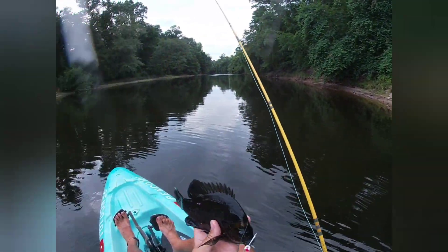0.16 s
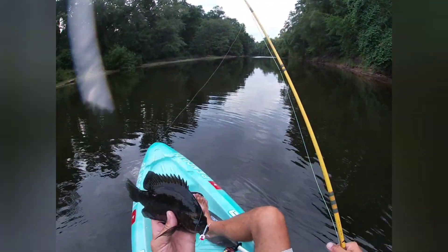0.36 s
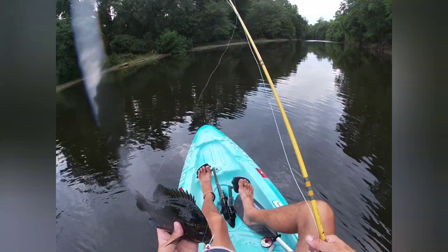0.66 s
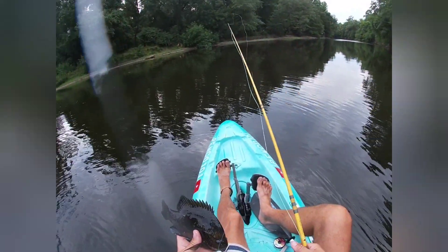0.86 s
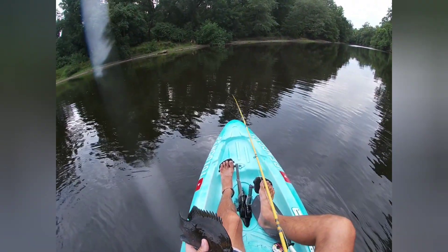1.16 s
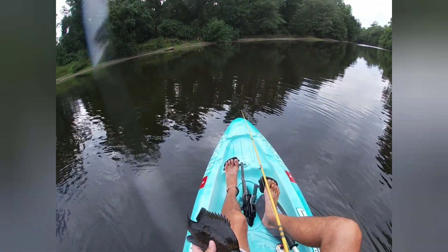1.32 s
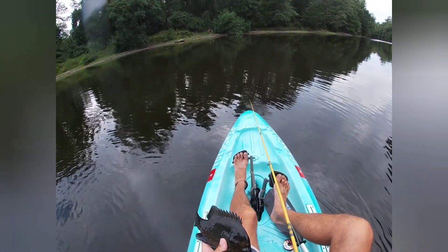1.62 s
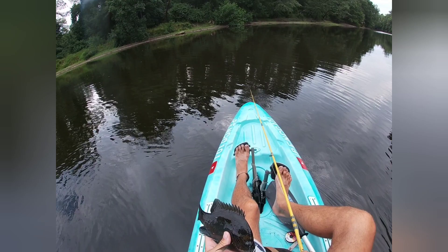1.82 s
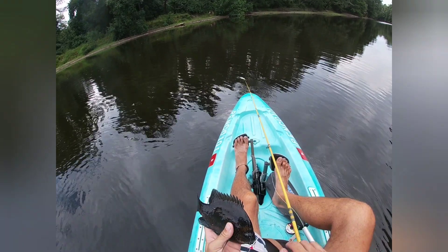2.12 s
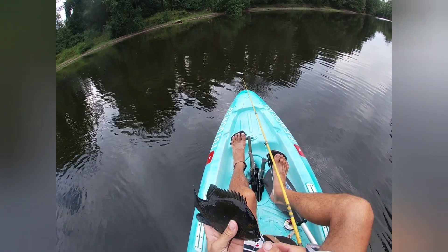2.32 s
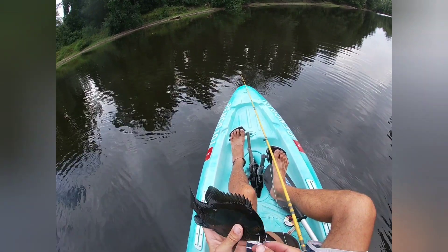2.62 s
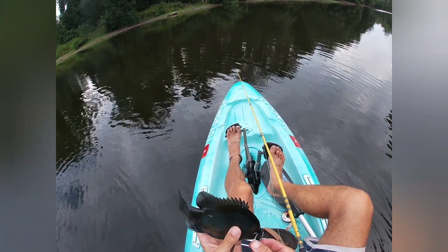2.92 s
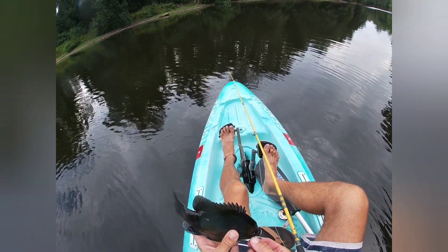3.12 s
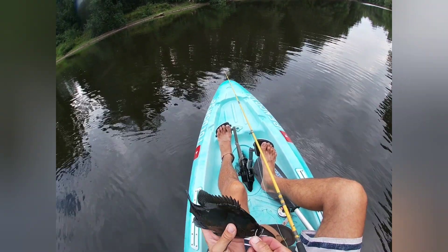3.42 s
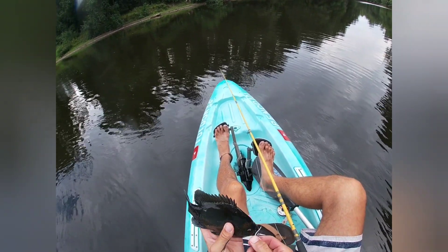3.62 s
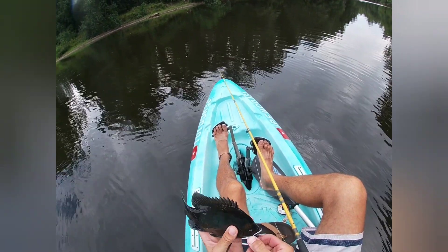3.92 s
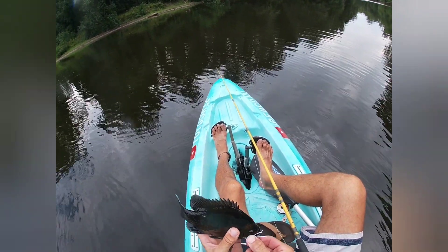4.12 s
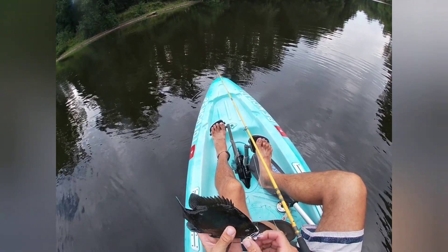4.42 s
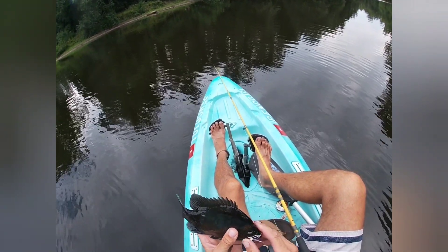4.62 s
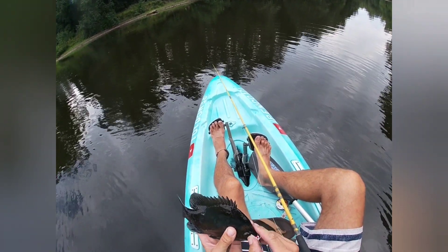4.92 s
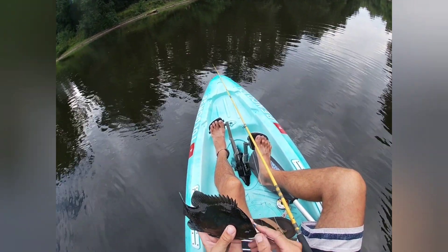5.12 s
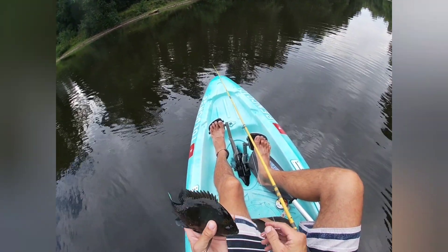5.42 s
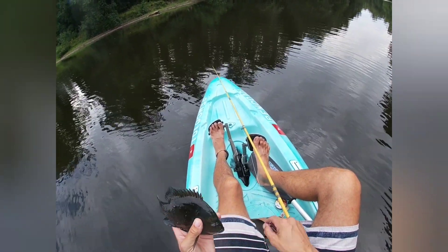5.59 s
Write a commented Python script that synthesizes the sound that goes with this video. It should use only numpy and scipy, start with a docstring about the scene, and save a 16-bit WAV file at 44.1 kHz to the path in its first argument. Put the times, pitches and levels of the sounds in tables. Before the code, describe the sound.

Outdoors on a calm river, cicadas and crickets hiss and buzz steadily. After a few dull gear taps and a bump, a fishing rod drops on a hollow plastic kayak with bright cracks and bounces at about 1.4 to 2 seconds. Afterwards the insects dominate, with short chirps, a second cicada joining, and a tiny metal clink near 5 seconds. Close microphone on the angler, mono, with light low air rumble.

```python
"""Still river with insects and a dropped rod

Cicadas (click trains ringing resonances, throbbing noise) and crickets (pulsed narrow noise) drone over a far
chorus of flickering noise bands. A fishing rod is laid down and bounces on a plastic kayak hull: noise cracks,
ringing rod and hull modes. The hull is tapped lightly, and gear bumps, rustles and clinks, as short modes and
puffs of noise. Low noise bands make air on the microphone, low thuds, and a growing far hum and drone."""
import sys
import numpy as np
from scipy import signal
from scipy.fft import rfft, irfft, next_fast_len
from scipy.io import wavfile
from scipy.ndimage import uniform_filter1d

SR = 44100
rng = np.random.default_rng(int(sys.argv[2]) if len(sys.argv) > 2 else 0)


def persist_wave(psi):
    """Save psi, clipped to +-1, as 16-bit WAV."""
    counts = np.round(np.clip(psi, -1, 1) * 32767).astype(np.int16)
    wavfile.write(sys.argv[1], SR, np.atleast_2d(counts).T)


N = 253822
TIME = np.arange(N) / SR


def undb(db):
    """Decibels to amplitude."""
    return 10 ** (np.asarray(db) / 20)


def unit(x):
    """Scale to rms 1."""
    return x / np.sqrt(np.mean(x ** 2))


def noise():
    """White noise over the whole scene."""
    return rng.standard_normal(N)


def curves(table):
    """Interpolate each column after the first over time."""
    time_s, *columns = np.transpose(table)
    return [np.interp(TIME, time_s, column) for column in columns]


def band(x, hz, width_hz):
    """Resonance with gain 1 at its centre."""
    return signal.lfilter(*signal.iirpeak(hz, hz / width_hz, SR), x)


def steep(x, hz, width_hz):
    """Resonance applied twice, at rms 1."""
    return unit(band(band(x, hz, width_hz), hz, width_hz))


def walk(rate_hz):
    """Random levels held 1 / rate_hz, smoothed twice; rms 1."""
    hold = int(SR / rate_hz)
    steps = np.repeat(rng.standard_normal(N // hold + 1), hold)
    smooth = uniform_filter1d(uniform_filter1d(steps, hold), hold)
    return unit(smooth[:N])


def strokes(rate_hz, sharp, drift=0.0115):
    """One swell per wing stroke or tymbal click at a drifting tempo; also returns phase in cycles."""
    phase = np.cumsum(rate_hz * (1 + drift * walk(5.5))) / SR + rng.random()
    return np.exp(sharp * (np.cos(2 * np.pi * phase) - 1)), phase


def coloured(points, size):
    """Frequencies and spectrum of noise shaped by (hz, level_db) points."""
    hz = np.fft.rfftfreq(size, 1 / SR) + 1  # +1 avoids log(0)
    point_hz, point_db = np.transpose(points)
    shape_db = np.interp(np.log(hz), np.log(point_hz), point_db, -90, -90)
    return hz, rfft(rng.standard_normal(size)) * undb(shape_db)


def burst(points, rise_s, t60_s):
    """Coloured noise that rises quickly and decays exponentially; peak 1."""
    t = np.arange(SR // 3) / SR
    hiss = irfft(coloured(points, len(t))[1], len(t))
    out = hiss * (1 - np.exp(-t / rise_s)) * 1000. ** (-t / t60_s)
    return out / np.abs(out).max()


def ring(push, modes, loose_db=1.7):
    """Decaying modes with random sign, level and slight detuning, driven by a push; peak 1."""
    t = np.arange(SR // 3) / SR
    chance = rng.standard_normal((len(modes), 3))
    body = 0
    for (hz, db, t60_s), (detune, level, sign) in zip(modes, chance):
        amp = np.sign(sign) * undb(db + loose_db * level)
        tone = np.sin(2 * np.pi * hz * (1 + 0.0035 * detune) * t)
        body = body + amp * tone * 1000. ** (-t / t60_s)
    out = signal.fftconvolve(body, push)[:len(t)]
    return out / np.abs(out).max()


def tick(level_db, hz, t60_s, pure):
    """One softly struck mode inside a short puff of noise round its pitch; pure is the ring's share."""
    puff = burst([(0.21 * hz, -22), (hz, 0), (3.56 * hz, -20)], 0.4 / hz, t60_s)
    blow = np.sin(2 * np.pi * hz * np.arange(int(2 * SR / hz)) / SR)  # contact lasts two cycles
    share = np.clip(pure, 0, 1)
    return undb(level_db) * (share * ring(blow, [(hz, 0, t60_s)]) + (1 - share) * puff)


def add(out, start_s, x):
    """Mix x into out from start_s."""
    i = int(start_s * SR)
    out[i:i + len(x)] += x[:N - i]


def struck_body(events, modes, pure):
    """Each (start_s, level_db) event strikes every mode of a body."""
    out = np.zeros(N)
    for start_s, level_db in events:
        add(out, start_s, sum(tick(level_db + db, hz, t60_s, pure) for hz, db, t60_s in modes))
    return out


def buzzing_cicada(rate_hz, body):
    """Uneven tymbal clicks, strong and weak in turn, ring the body; echoes from the trees blur them."""
    clicks, phase = strokes(rate_hz * (1 + .003 * walk(60)), 600, drift=.0008)
    clicks = clicks * (1 + 0.21 * np.cos(np.pi * phase)) * undb(2.5 * walk(30))
    t = np.arange(SR // 4) / SR
    trees = rng.standard_normal(len(t)) * 1000. ** (-t / 0.15)
    trees[0] += 40  # direct sound
    drive = signal.fftconvolve(clicks, trees)[:N]
    return unit(sum(undb(db) * steep(drive, hz, width_hz) for hz, width_hz, db in body))


def cricket(hz, width_hz, rate_hz, sharp=0.81):
    """Narrow wing tone, blurred by distance, one swell per stroke."""
    return unit(strokes(rate_hz, sharp)[0] * steep(noise(), hz, width_hz))


# far insects and river air, smeared into a hiss: hz, relative_db_per_hz
CHORUS_SPECTRUM = [(150, -54), (250, -13.5), (450, -26), (740, -16.5), (1050, -24.5), (1600, -24.5),
                   (3200, -4), (4850, -4), (6750, -9), (7900, -0.5), (9380, -10.5), (9750, -24.5),
                   (11500, -33), (15400, -37)]


def chorus():
    """Countless far insects: noise in third octaves that flicker apart."""
    size = next_fast_len(N)
    (hz, spectrum), out = coloured(CHORUS_SPECTRUM, size), 0
    for step in range(21):
        share = np.clip(1 - np.abs(3 * np.log2(hz / 150.) - step), 0, 1)  # overlapping triangles
        out = out + irfft(spectrum * share, size)[:N] * undb(0.75 * walk(9))
    return unit(out) * undb(-49.5)


# tymbal tempo, before small random drift: time_s, clicks_per_s
FIRST_RATE = [(0, 280), (2.1, 286.2), (3.2, 291.8), (4, 297.5), (4.6, 299), (5.76, 300)]
# body resonances: hz, width_hz, relative_db
FIRST_BODY = [(4660, 300, -1), (9190, 660, -5.5)]
# song coming and going on the air: time_s, level_db
FIRST_LEVEL = [(0, -75), (.4, -62), (1.2, -58.5), (1.7, -66), (2.2, -58), (3.05, -57), (3.4, -61),
               (4.4, -61.5), (5.76, -60.5)]


def first_cicada():
    """Tymbal buzz that speeds up as the insect warms to its song."""
    return undb(curves(FIRST_LEVEL)[0]) * buzzing_cicada(curves(FIRST_RATE)[0], FIRST_BODY)


# rasp resonances: hz, width_hz, relative_db
RASP_BODY = [(4860, 1500, -10.5), (5590, 1500, 5), (3100, 2700, -7.5)]
RASP_DB, RASP_SWELL_DB, RASP_PEAK_S, RASP_SWELL_S = -58, 8.5, 0.74, 0.56


def swelling_cicada():
    """Broad noise rasp throbbing about 14 times a second; swells once above its resting level."""
    throb = 1 + 0.93 * strokes(14.0, 8.0)[0]
    rasp = unit(throb * sum(undb(db) * steep(noise(), hz, width_hz) for hz, width_hz, db in RASP_BODY))
    swell = np.exp(-.5 * ((TIME - RASP_PEAK_S) / RASP_SWELL_S) ** 2)
    return undb(RASP_DB + RASP_SWELL_DB * swell) * rasp


# steady trills: hz, width_hz, wing_strokes_per_s, relative_db
TRILL_VOICES = [(7980, 140, 76, -5), (8080, 200, 92, -6), (7710, 200, 210, -5)]
TRILL_DB, TRILL_RISE_DB_PER_S = -58, 0.93


def trilling_crickets():
    """Stroke-pulsed narrow tones that grow steadily."""
    trills = unit(sum(undb(db) * cricket(hz, width_hz, rate_hz)
                      for hz, width_hz, rate_hz, db in TRILL_VOICES))
    return undb(TRILL_DB + TRILL_RISE_DB_PER_S * TIME) * trills


# low wing tone: hz, width_hz, wing_strokes_per_s
LOW_VOICE = (4790, 150, 140)
LOW_DB, LOW_REST_DB, LOW_REST_AT_S, LOW_REST_S = -60.5, -6, 2.3, 0.54


def low_cricket():
    """Wavering low wing tone that slackens for a while."""
    rest = np.exp(-.5 * ((TIME - LOW_REST_AT_S) / LOW_REST_S) ** 2)
    level_db = LOW_DB + LOW_REST_DB * rest + 1.8 * walk(5.05)
    return undb(level_db) * cricket(*LOW_VOICE, sharp=0.45)


# low rumble and flutter levels: air on the microphone, with low thuds near the bump and knocks;
# a random waver is added: time_s, rumble_db, flutter_db
LOW_LEVELS = [(0.0, -72, -84), (0.05, -57.5, -63.5), (0.67, -49.5, -64.5), (0.75, -64, -71),
              (0.87, -47, -50), (1.3, -63.5, -77), (1.43, -77, -53), (1.51, -52.5, -59), (1.87, -68, -68),
              (2.26, -65, -84), (2.55, -83, -80), (3.83, -65.5, -76), (4.23, -74, -85), (4.73, -57.5, -57),
              (4.92, -68, -68), (5.5, -70, -72), (5.61, -56, -84), (5.76, -80, -74)]


def low_air_and_thuds():
    """Air on the microphone, with low thuds near the bump and knocks: two wavering low noise bands."""
    rumble_db, flutter_db = curves(LOW_LEVELS)
    rumble = steep(noise(), 27.0, 37.4) * undb(2.0 * walk(11))
    flutter = steep(noise(), 100.5, 65) * undb(2.3 * walk(8.2))
    return undb(rumble_db) * rumble + undb(flutter_db) * flutter


HUM_HZ, HUM_WIDTH_HZ, HUM_DB, HUM_RISE_DB_PER_S = 162.7, 65, -65.5, .7


def far_hum():
    """Wavering low noise band that slowly grows."""
    hum = steep(noise(), HUM_HZ, HUM_WIDTH_HZ) * undb(2.27 * walk(4.9))
    return undb(HUM_DB + HUM_RISE_DB_PER_S * TIME) * hum


DRONE_HZ, DRONE_WIDTH_HZ, DRONE_DB, DRONE_RISE_DB_PER_S = 221.7, 20.4, -98.5, 6


def high_drone():
    """Noise band higher and narrower than the hum, rising towards the end."""
    return steep(noise(), DRONE_HZ, DRONE_WIDTH_HZ) * undb(DRONE_DB + DRONE_RISE_DB_PER_S * TIME)


# dull taps on the hull: start_s, level_db, pitch_hz
HULL_TAPS = [(.085, -52, 810), (.61, -52, 695), (.648, -26, 2770), (.808, -35.5, 1325), (.845, -47.5, 810),
             (.93, -40.5, 796), (1.292, -44.5, 1270), (1.519, -50, 790), (1.667, -51, 2500),
             (1.718, -51, 710), (2.385, -53, 594), (2.729, -43, 1700), (3.925, -54, 680)]
TAP_CYCLES, TAP_PURE = 22, 0.22  # cycles until 60 dB down; ring share 0-1


def hull_taps():
    """Damped taps that die after a set number of cycles."""
    out = np.zeros(N)
    for start_s, level_db, pitch_hz in HULL_TAPS:
        add(out, start_s, tick(level_db, pitch_hz, TAP_CYCLES / pitch_hz, TAP_PURE))
    return out


# chirps of a nearer cricket: start_s, level_db
CHIRP_EVENTS = [(.33, -61), (1.03, -63), (1.48, -54.5), (1.72, -65), (2.108, -59), (2.33, -59), (2.7, -58),
                (2.94, -58), (3.2, -60), (3.45, -58), (4.26, -59), (4.49, -58), (4.7, -60), (4.9, -59),
                (5.45, -64)]
CHIRP_HZ, CHIRP_WIDTH_HZ, CHIRP_STROKES_PER_S = 7170, 220, 41
CHIRP_S, CHIRP_EDGE_S = 0.133, .015


def chirping_cricket():
    """Pulsed wing tone gated into short chirps with sloping edges."""
    gate = 0
    for start_s, level_db in CHIRP_EVENTS:
        edge_distance_s = np.minimum(TIME - start_s, start_s + CHIRP_S - TIME)
        gate = gate + undb(level_db) * np.clip(edge_distance_s / CHIRP_EDGE_S, 0, 1)
    return gate * cricket(CHIRP_HZ, CHIRP_WIDTH_HZ, CHIRP_STROKES_PER_S, sharp=0.62)


# bumps: start_s, level_db
BUMP_EVENTS = [(.806, -27.5), (.94, -46), (3.93, -55)]
# mount modes: hz, relative_db, t60_s
MOUNT_MODES = [(147, -11.5, 0.23), (253, 1, .045), (480, -11, 0.07)]


def mount_bumps():
    """Something bumps the mount: low modes, mostly pure ring."""
    return struck_body(BUMP_EVENTS, MOUNT_MODES, pure=.7)


# rod contacts: start_s, rod_peak_db, hull_db, crack_peak_db, best_excited_hz
ROD_CONTACTS = [(1.3826, -13, -31.5, -12, 3220), (1.3845, -21, -39, -16, 3520),
                (1.4089, -17.5, -33, -22, 3180), (1.4136, -19.5, -33.5, -26, 3350),
                (1.4226, -23, -42, -34, 3150), (1.5723, -14, -31.5, -14, 2740),
                (1.579, -20, -33.5, -32, 2280), (1.5914, -20, -34, -28, 2500),
                (1.596, -22, -30.5, -25, 2940), (1.7962, -38, -49.5, -47, 3000),
                (1.8242, -32, -30.5, -22, 2800), (1.87, -44, -38, -44, 2500),
                (1.9447, -33, -32.5, -50, 2470), (1.9713, -34.5, -34.5, -40, 2500),
                (1.992, -26, -33.5, -27, 2550), (2.0078, -25.5, -36, -23.5, 2500),
                (2.015, -30, -40.5, -27, 2500), (2.036, -39, -37.5, -41, 2500)]
# rod modes: hz, relative_db, t60_s
ROD_MODES = [(1780, -16, .05), (2115, -10, 0.05), (2220, -10, 0.03), (2385, -10, 0.052), (2540, -6, .05),
             (2780, -12, 0.073), (3040, 0, 0.028), (3148, -6, 0.059), (3270, -9.5, 0.033),
             (3634, -1.5, 0.043), (4070, -9, 0.025), (4700, 2, 0.014), (5380, 0, 0.016), (6300, -6, 0.022),
             (7200, 3, 0.024), (7700, -10, 0.01), (10000, -18, .02)]
# hull modes: hz, relative_db, t60_s
HULL_MODES = [(160.4, -4.5, 0.28), (267.5, 0, 0.18), (408, -7.5, 0.14), (795, -6, 0.14), (1266, 1.5, 0.1),
              (1580, -3, 0.062)]
# contact crack spectrum: hz, relative_db_per_hz
CRACK_SPECTRUM = [(800, -24), (2500, 2), (5500, 1), (7800, -3), (8800, -17), (10300, -14), (12000, -32),
                  (15000, -39)]
# hull clatter spectrum: hz, relative_db_per_hz
CLATTER_SPECTRUM = [(80, -24), (180, -0.5), (500, -4), (1200, -8), (2000, -15), (3200, -22), (6000, -16)]
RATTLE_S = 0.0042  # e-fold decay


def rod_knocks():
    """Each contact cracks and rattles briefly into the rod; the hull answers a moment later."""
    out, t = np.zeros(N), np.arange(SR // 25) / SR
    for start_s, rod_db, hull_db, crack_db, best_hz in ROD_CONTACTS:
        tilt_db = 0.46 * (crack_db + 14.5)  # per octave above 3 kHz: softer cracks are duller
        crack = [(hz, db + tilt_db * max(np.log2(hz / 3000.0), 0)) for hz, db in CRACK_SPECTRUM]
        add(out, start_s, undb(crack_db) * burst(crack, 0.00024, 0.015))

        push = 0.042 * rng.standard_normal(len(t)) * np.exp(-t / RATTLE_S)
        push[0] += 1
        push = steep(push, best_hz, 0.5 * best_hz)  # the place of contact favours some modes
        add(out, start_s, undb(rod_db) * ring(push, ROD_MODES))

        spread = rng.standard_normal(len(t)) * t * np.exp(-t / 0.0019)  # slow bending waves in the hull
        add(out, start_s, undb(hull_db - 3.5) * ring(spread, HULL_MODES))
        # the shell's many weak modes blur to noise
        add(out, start_s, undb(hull_db) * burst(CLATTER_SPECTRUM, 0.0014, 0.15))
    return out


# body resonances: hz, width_hz, relative_db
SECOND_CICADA_BODY = [(4434, 470, -1.5), (9050, 870, -7.5)]
SECOND_START_S, SECOND_FADE_IN_S, SECOND_DB, SECOND_RISE_DB_PER_S = 2.8, 0.27, -61.5, 2
SECOND_TOP_CLICKS_PER_S, SECOND_SHORT_BY_CLICKS_PER_S, SECOND_WARM_S = 296, 17, 1.5


def second_cicada():
    """Tymbal buzz that joins late, grows, and warms exponentially towards its top rate."""
    since_s = np.maximum(TIME - SECOND_START_S, 0)
    shortfall = SECOND_SHORT_BY_CLICKS_PER_S * np.exp(-since_s / SECOND_WARM_S)
    fade_in = np.minimum(since_s / SECOND_FADE_IN_S, 1)
    level = undb(SECOND_DB + SECOND_RISE_DB_PER_S * since_s) * fade_in
    return level * buzzing_cicada(SECOND_TOP_CLICKS_PER_S - shortfall, SECOND_CICADA_BODY)


# one faint rustle: start_s, peak_db, centre_hz, t60_s
RUSTLE_EVENT = (4.31, -59, 950, 0.1)


def rustle():
    """A single puff of noise without ring."""
    out = np.zeros(N)
    add(out, RUSTLE_EVENT[0], tick(*RUSTLE_EVENT[1:], pure=0))
    return out


# clinks: start_s, level_db
CLINK_EVENTS = [(4.9445, -27.5), (4.953, -35)]
# metal part modes: hz, relative_db, t60_s
METAL_MODES = [(2590, 0, .021), (6950, -7, .012)]


def metal_clinks():
    """A small metal part clinks: short, nearly pure modes."""
    return struck_body(CLINK_EVENTS, METAL_MODES, pure=.92)


def scene():
    """Sum of all sources, one channel."""
    insects = (chorus() + first_cicada() + swelling_cicada() + trilling_crickets() + low_cricket()
               + chirping_cricket() + second_cicada())
    lows = low_air_and_thuds() + far_hum() + high_drone()
    gear = hull_taps() + mount_bumps() + rod_knocks() + rustle() + metal_clinks()
    return (insects + lows + gear)[None]


TOP_HZ = 15500


def record(dry):
    """Steep elliptic low-pass cuts the top."""
    return signal.sosfilt(signal.ellip(10, .2, 60, TOP_HZ, fs=SR, output="sos"), dry)


dry = scene()
out = record(dry)
persist_wave(out)
```